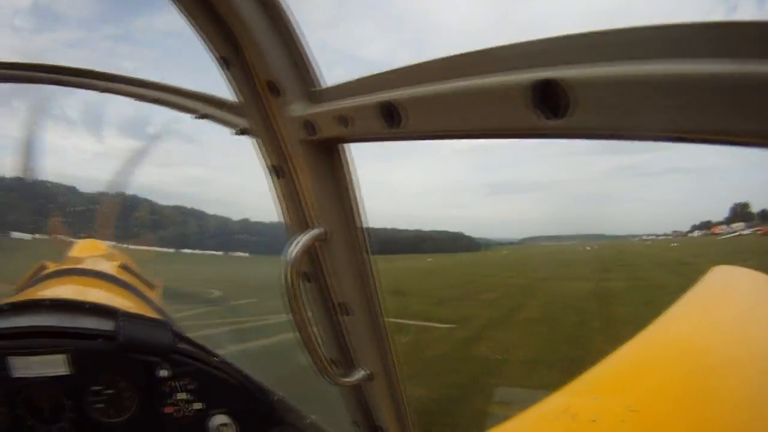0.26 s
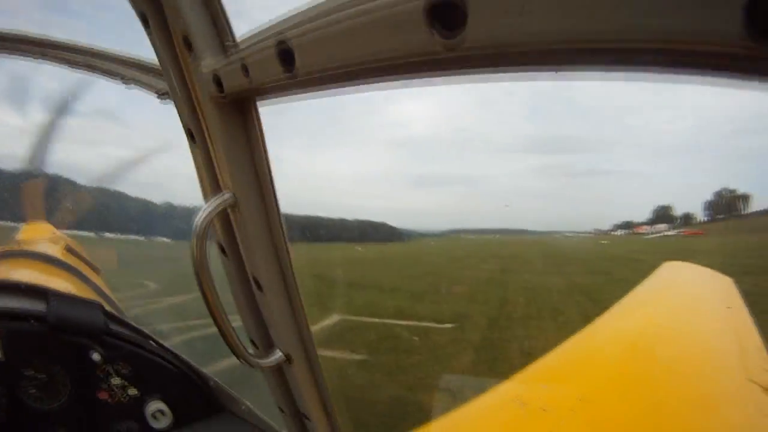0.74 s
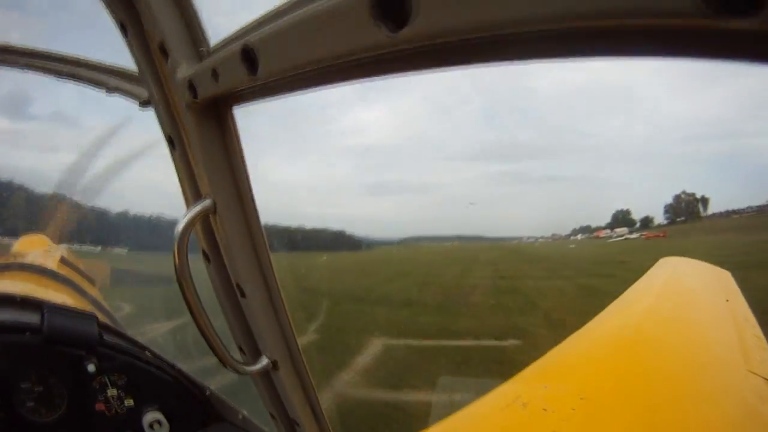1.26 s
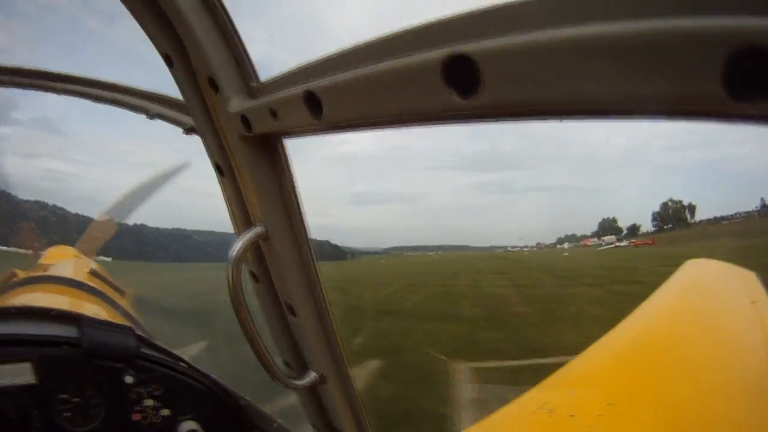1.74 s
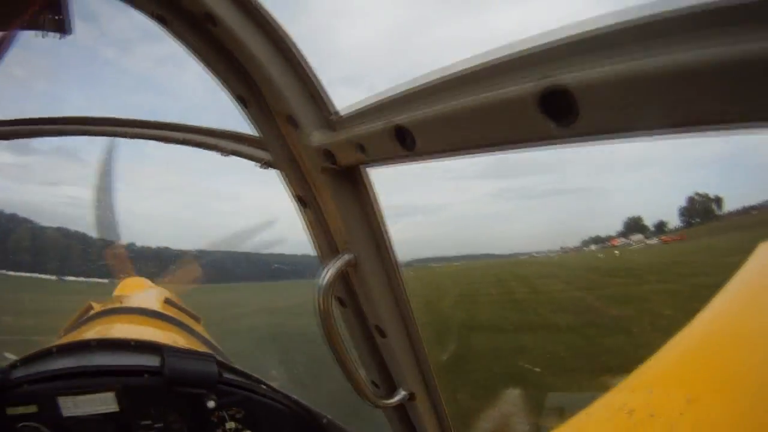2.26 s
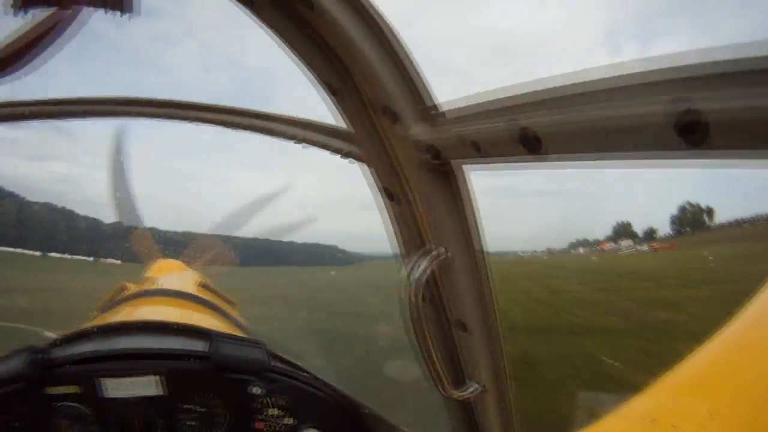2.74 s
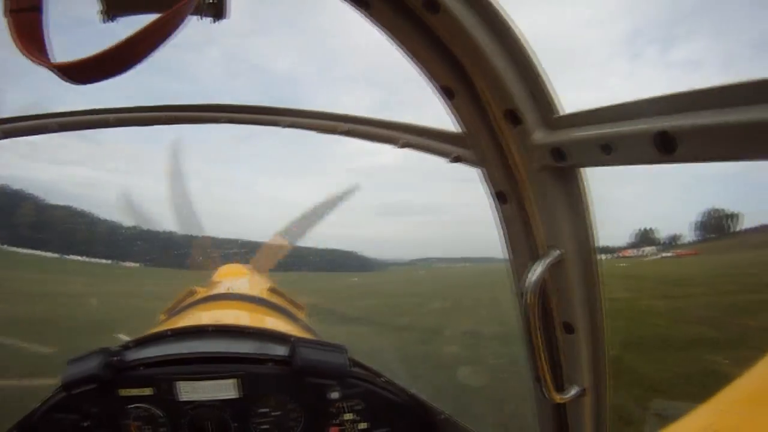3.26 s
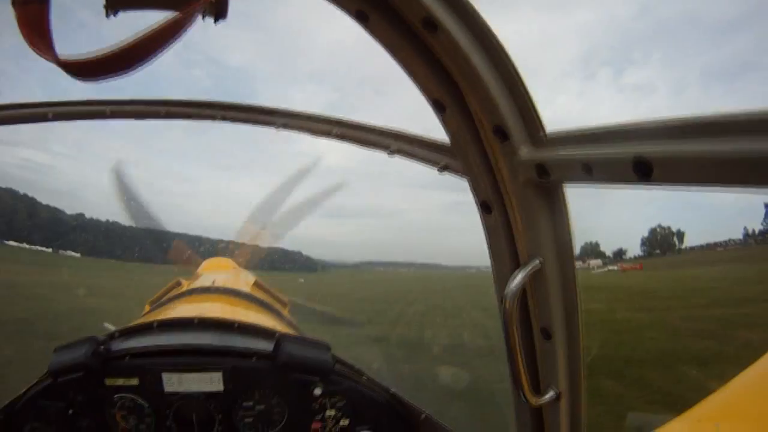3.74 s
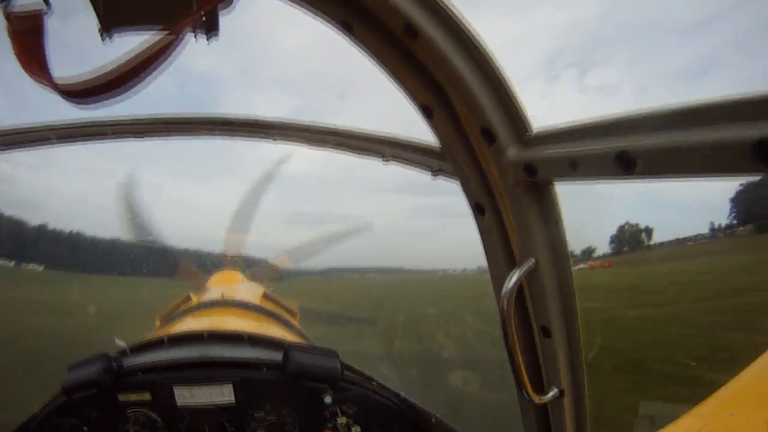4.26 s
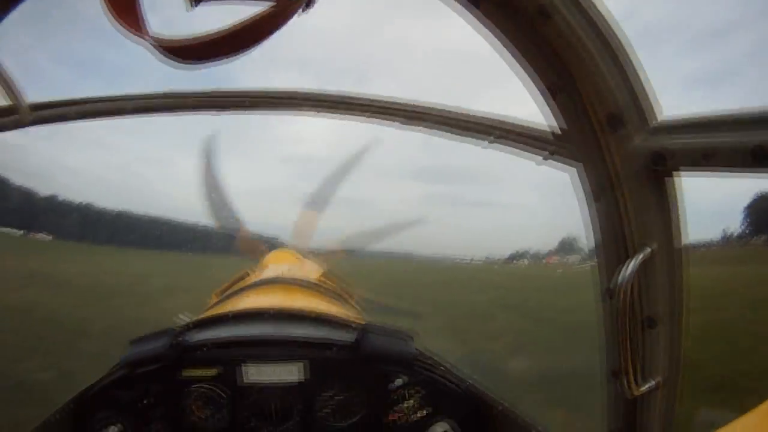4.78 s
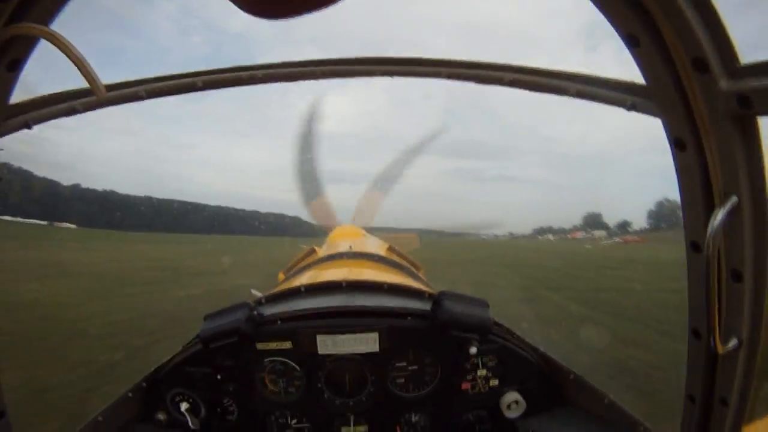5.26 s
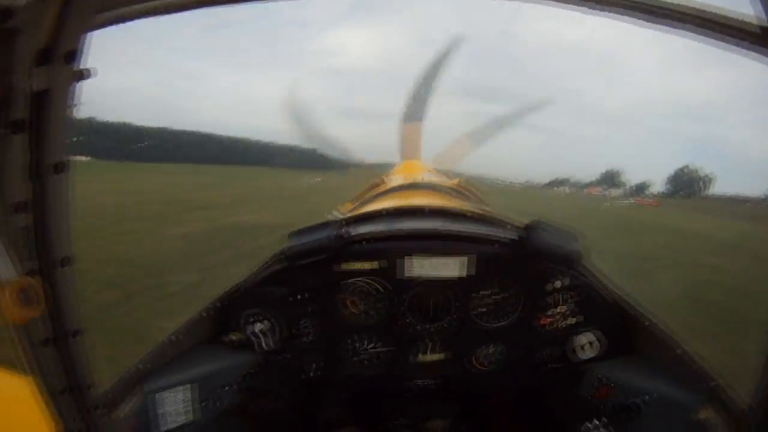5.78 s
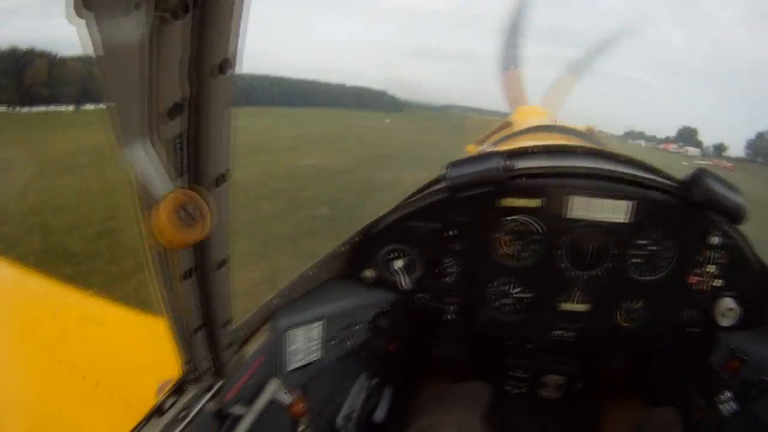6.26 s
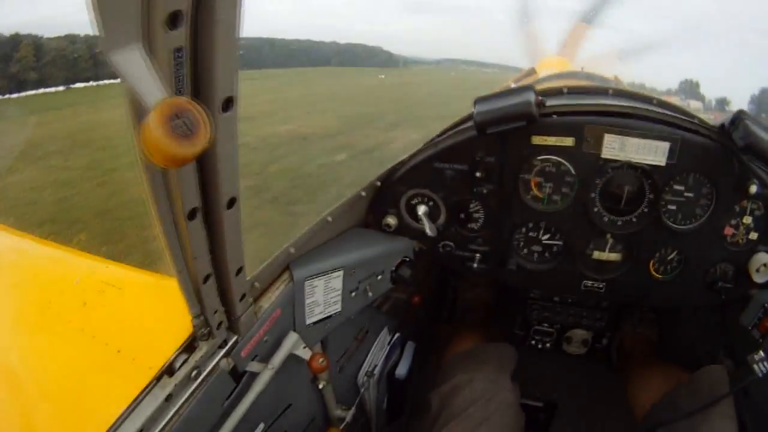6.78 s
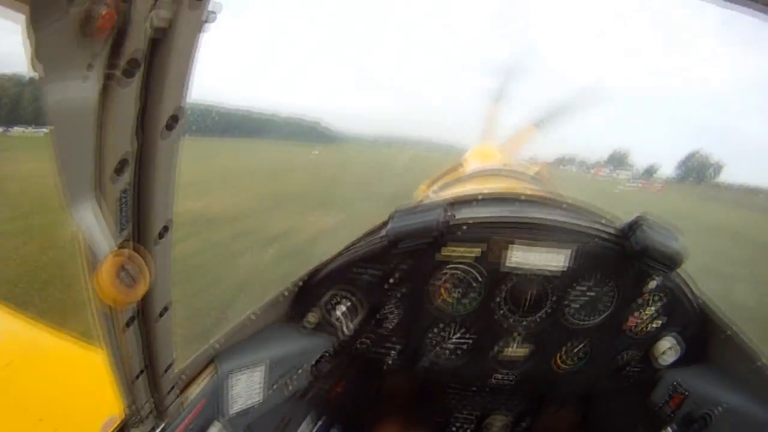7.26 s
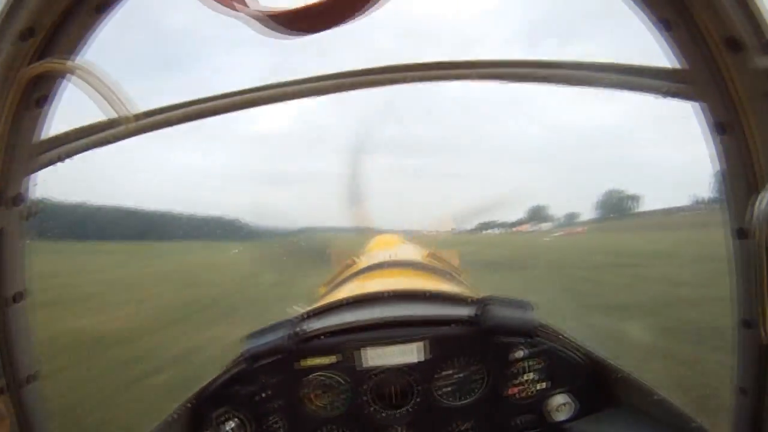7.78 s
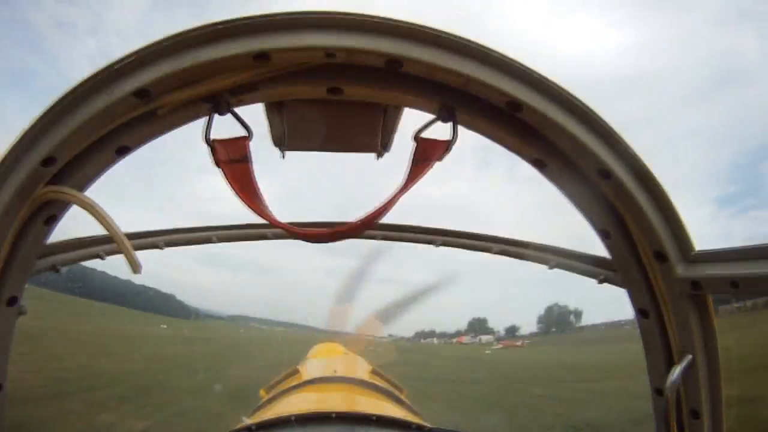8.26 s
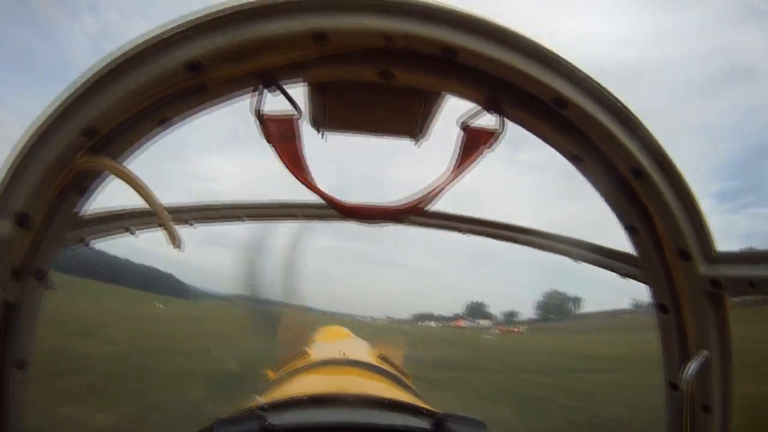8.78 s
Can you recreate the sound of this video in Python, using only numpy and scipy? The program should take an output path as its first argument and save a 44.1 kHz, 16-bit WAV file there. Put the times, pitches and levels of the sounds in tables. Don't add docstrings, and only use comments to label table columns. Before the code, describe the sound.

Heard inside a small aircraft cabin taxiing on grass: a piston engine booms and clatters steadily, drops to a slower, lumpier idle after a second, then picks up at about four seconds. Canopy rail, latch and window parts knock and buzz irregularly over low wheel rumble. The final half second brings a fast rise in revs. A small cased camera gives a close, boxy, gritty sound.

```python
import sys
import numpy as np
from scipy import signal
from scipy.io import wavfile
from scipy.ndimage import uniform_filter1d

SR = 44100
rng = np.random.default_rng(int(sys.argv[2]) if len(sys.argv) > 2 else 0)


def boost_factor(decibels):
    exponent = np.asarray(decibels, float) / 20
    return 10 ** exponent


def generate_wav(signal):
    frames = np.transpose(np.atleast_2d(signal))
    scaled = np.clip(frames, -1, 1) * 32767
    pcm = np.round(scaled).astype(np.int16)
    wavfile.write(sys.argv[1], SR, pcm)


N = 397782

# [t/s, firing rate f/Hz]
FIRING_RATE = [(0.0, 35.35), (0.88, 34.99), (1.3, 28.09), (1.61, 25.43), (1.98, 23.86), (2.49, 23.21),
               (3.4, 21.74), (3.85, 22.46), (4.0, 26.97), (4.38, 34.71), (4.6, 32.15), (5.02, 32.82),
               (5.14, 33.31), (6.14, 35.78), (7.7, 37.62), (8.35, 38.0), (8.77, 52.68), (9.02, 58.91)]
# [t/s, level/dB]
EFFORT = [(0, -0.5), (.8, -1), (1.1, -0.5), (1.9, -3.5), (2.8, -1.5), (3.5, -2), (3.85, 0.5), (4.05, 3),
          (4.4, 0.5), (5.45, 1.5), (5.85, -0.5), (6.3, -0.5), (7.4, .5), (8.15, -.5), (8.36, 3),
          (8.54, 3.5), (9.02, 3.5)]
# [t/s, side (-1 right wing, 0 ahead, 1 left wing)]
FACING = [
    (0, -0.96),
    (2.7, -0.9),
    (3.3, -0.13),
    (5.6, 0.35),
    (6.2, 0.67),
    (7.2, 0.1),
    (7.8, 0.087),
    (9.02, 0.24),
]
# [firing level/dB, clatter level/dB]
CYLINDERS = [(-5, 11), (-4, 12), (-3, 13.5), (-5.7, 13)]
# [t/s, extra level/dB]
ODD_FIRINGS = [(.682, -3), (.853, 2), (1.0, -5), (1.258, -4), (1.293, -9), (1.365, -2), (1.438, 0),
               (1.96, -2), (1.996, -6), (2.08, -6), (2.207, 7.5), (2.51, -4), (2.68, -4), (3.934, -6),
               (4.01, -5), (4.73, -4), (5.007, 0), (5.687, 3), (5.716, -13), (6.613, -8), (6.914, 1),
               (7.077, 1.5), (7.428, -10), (7.641, -5), (7.721, 2.5), (8.456, 5), (8.6, -6), (8.76, -3)]
# [f/Hz, width/Hz, level/dB, level per facing/dB, share of effort]
CABIN_MODES = [(24, 6, -33, 0, 0), (33, 4, -28, -1.5, 0), (60, 20, -30, 0, .8), (85, 25, -30, 2, 1.2),
               (112, 25, -27, 3, 1), (146, 32, -27, 1, -.6), (178, 28, -26, -1, -.2),
               (205, 20, -39, 0, 2.4), (226, 18, -31, 2.5, 1), (244, 16, -29, -2, 0), (290, 40, -40, 0, 2),
               (400, 200, -42.5, 0, 2.6)]
# [f/Hz, level per Hz/dB]
CABIN_SPECTRUM = [(24, -5), (40, -5), (97, 5.5), (145, 4), (178, 1), (205, -3.5), (249, -1), (307, -10),
                  (420, -15), (550, -42), (920, -120)]
# [f/Hz, level per Hz/dB]
PANEL_SPECTRUM = [(140, -16.5), (240, 3), (291, -1.5), (328, -4.5), (466, 0), (560, -6), (682, -21),
                  (831, -25), (1100, -24), (1430, -74), (2420, -120)]
# [f/Hz, level per Hz/dB]
GROUND_SPECTRUM = [(5.9, -46), (10, -4), (32, 3), (70, -4), (91, -4), (150, -120)]
# [f/Hz, level per Hz/dB]
METAL_SPECTRUM = [(380, -48), (650, -13.5), (883, -13), (1270, -5), (1590, -7), (1770, -5), (2220, -5.5),
                  (2550, -8), (2900, -8.5), (4170, -17), (4930, -16), (5360, -16.5), (5990, -24),
                  (7790, -60), (13200, -120)]
# [f/Hz, width/Hz, level/dB]
FRAME_PARTS = [(1270, 480, -10.5), (1780, 190, -8), (2260, 340, -4.4), (2853, 142, 0.6), (3253, 460, -1),
               (3870, 300, -1), (4580, 560, -3)]
# [t/s, half length/s, level/dB]
SHUDDERS = [
    (1.07, 0.092, 10),
    (3.998, 0.25, 7),
]
# [t/s, extra level/dB]
BUMPS = [(1.06, 13), (1.6, 12), (2.1, 5), (2.74, 13), (3.9, -1), (4.52, 11), (5.4, -5), (6.56, 3), (7.3, 3),
         (8.0, 10), (8.55, 8)]
# [t/s, peak level/dB, ring f/Hz]
RAIL_KNOCKS = [(.1447, -30, 2070), (.524, -30, 1780), (1.066, -24, 2040), (1.4549, -18, 2180),
               (1.6778, -27, 2170), (1.797, -28.5, 2300), (1.9612, -30, 2050), (2.0475, -27, 2150),
               (2.1256, -24, 2010), (2.8197, -24, 2080), (3.042, -23.5, 2280), (3.8645, -28, 1930),
               (3.822, -20.5, 2060), (3.911, -29, 2320), (4.008, -22, 2260), (4.139, -23, 2300),
               (4.3256, -21.5, 2000), (4.4616, -25, 2070), (5.1483, -26, 2110), (5.3093, -23, 1970),
               (5.3875, -22.5, 2350), (5.5636, -20.5, 1840), (5.678, -24.5, 1800), (5.8553, -20, 2160),
               (6.08, -27, 2250), (6.224, -28, 2250), (7.0637, -26.5, 1830), (7.643, -24, 2350),
               (8.4827, -24, 1800), (8.5505, -22, 1670)]
# [t/s, peak level/dB]
LATCH_KNOCKS = [(1.322, -21.5), (1.3905, -28), (1.4211, -16), (1.491, -24.5), (1.6307, -28.5),
                (1.9114, -30.5), (2.2947, -24.5), (2.5558, -23.5), (2.595, -24.5), (2.6855, -31),
                (2.999, -29), (3.175, -29), (3.224, -25.5), (3.5373, -26.5), (3.5857, -29), (4.5817, -25.5),
                (5.74, -21), (5.89, -26), (5.9365, -24.5), (6.364, -24.5), (6.4475, -32), (6.559, -26),
                (6.7354, -26), (6.89, -23), (7.2154, -27), (7.3223, -26), (7.39, -24), (8.28, -32),
                (8.7156, -32)]
# [t/s, peak level/dB]
WINDOW_BUZZES = [(3.311, -26.5), (4.139, -29), (5.309, -28), (5.5, -36), (5.615, -30), (5.85, -28),
                 (5.89, -27), (5.965, -27), (6.0797, -27), (6.2234, -25.5), (6.26, -36), (6.56, -28)]
# [t/s, peak level/dB, ring f/Hz]
CHINKS = [(1.3256, -36, 4800), (1.3907, -35, 4550), (1.4252, -30, 5100), (1.4596, -33.5, 4540),
          (1.49, -35, 4670), (1.8362, -49, 4800), (1.9165, -43, 4750), (1.9985, -40, 4380),
          (2.168, -36.5, 5170), (3.2216, -42, 4470), (3.5359, -43, 4540), (4.0088, -48, 4970),
          (4.4598, -43, 4540), (4.951, -34, 4300), (5.2829, -48, 4300), (5.3098, -38, 4930),
          (5.4294, -35, 5000), (5.5469, -37, 4830), (5.659, -30.5, 4800), (6.228, -34, 4740),
          (6.4487, -33, 4870), (6.777, -31, 4830), (6.8874, -35, 4700), (6.999, -36, 4800),
          (7.1063, -52, 4500), (7.213, -37, 5000), (8.4574, -31, 4900), (8.736, -36, 4430)]


def evened(x):
    return x / np.sqrt(np.mean(x ** 2) + 1e-20)


def columns(rows):
    s, *values = np.transpose(rows)
    return [np.interp(np.arange(N) / SR, s, v) for v in values]


def drift(count, span_s):
    size = max(int(span_s * SR / 400), 1)
    steps = uniform_filter1d(rng.standard_normal((count, N // 400 + 2)), size, axis=1)
    return np.array([np.interp(np.arange(N) / 400, np.arange(len(v)), evened(v)) for v in steps])


def coloured(x, spectrum):
    hz, db = np.transpose(spectrum)
    f = abs(np.fft.fftfreq(2 ** 15, 1 / SR)) + 1
    log_gain = np.log(boost_factor(np.interp(np.log(f), np.log(hz), db, left=-70, right=-90)))
    taps = np.fft.ifft(np.exp(np.conj(signal.hilbert(log_gain)))).real[:2 ** 13]
    return evened(signal.oaconvolve(x, taps)[:len(x)])


def resonate(x, hz, width_hz):
    r = np.exp(-np.pi * width_hz / SR)
    return 2 * signal.lfilter([1 - r], [1, -r * np.exp(2j * np.pi * hz / SR)], x).real


def wheels():
    t = np.arange(N) / SR
    base_db, db_per_s, bump_s = -34, -0.55, 0.17
    bumps_db = sum(extra_db * np.exp(-((t - s) / bump_s) ** 2) for s, extra_db in BUMPS)
    return boost_factor(base_db + db_per_s * t + bumps_db) * coloured(rng.standard_normal(N), GROUND_SPECTRUM)


def loose_knocks():
    hard_db, ring_per_db = -15, 0.045
    knocks = [(s, db, hz, 0.077, ring_per_db * (hard_db - db)) for s, db, hz in RAIL_KNOCKS]
    knocks += [(s, db, 2904, 0.071, ring_per_db * (hard_db - db)) for s, db in LATCH_KNOCKS]
    knocks += [(s, db, 1280, 0.15, 0.79) for s, db in WINDOW_BUZZES]
    knocks += [(s, db + 7.5, hz, 0.045, 0.65) for s, db, hz in CHINKS]
    return knocks


def canopy():
    out = np.zeros(N + SR)
    t = np.arange(SR // 10) / SR
    rise_s, hold_s, ring_width_hz = 0.0032, 0.008, 320
    spill_ratio, spill_gain = 0.773, 0.51
    knocks = loose_knocks()
    noise = rng.standard_normal((len(knocks), 2, len(t)))
    shaken = noise[:, 0].ravel()
    shaken = shaken + 2.0 * sum(boost_factor(db) * resonate(shaken, hz, width) for hz, width, db in FRAME_PARTS[1:])
    broad = coloured(shaken, METAL_SPECTRUM[3:]).reshape(len(noise), -1)
    for (s, db, hz, t60_s, share), wide, white in zip(knocks, broad, noise[:, 1]):
        shape = np.minimum(t / rise_s, 1) * boost_factor(-60 * np.maximum(t - hold_s, 0) / max(t60_s, 0.01))
        ring = 0
        for f, gain in ((hz, 1), (hz * spill_ratio, spill_gain)):
            ring = ring + gain * resonate(resonate(white * shape, f, ring_width_hz), f, ring_width_hz)
        share = np.clip(share, 0, 1)
        knock = np.sqrt(1 - share) * evened(wide * shape) + np.sqrt(share) * evened(ring)
        out[round(s * SR):][:len(t)] += boost_factor(db - 3.0) * knock / abs(knock).max()
    return out[:N]


def lumpiness():
    smooth_hz, lumpy_hz = 36, 27
    return np.clip((smooth_hz - columns(FIRING_RATE)[0]) / (smooth_hz - lumpy_hz), 0, 1)


def level_db(base_db, per_effort, facing_db, lumpy_db):
    moved_db = per_effort * columns(EFFORT)[0] + facing_db * columns(FACING)[0]
    return base_db + moved_db + lumpy_db * lumpiness()


def steadiness():
    return np.maximum(1.95 + 0.27 * columns(EFFORT)[0] - 0.42 * lumpiness(), 0.1)


def firings():
    turns = np.cumsum(columns(FIRING_RATE)[0]) / SR + 0.9
    chance = np.clip(rng.standard_normal((400, 12)), -1.9, 1.7)
    scatter_db = 1.8 + 1.7 * lumpiness()
    scatter_db = np.resize(scatter_db[np.flatnonzero(np.diff(turns.astype(int)))], len(chance))
    odd_s, odd_db = np.transpose(ODD_FIRINGS)
    odd = turns[((odd_s + 0.009) * SR).astype(int)].astype(int)
    chance[odd, :3] = (odd_db / scatter_db[odd])[:, None] * [1.7, 1.3, 1.1]
    strength_db, tick_db = np.array(CYLINDERS)[np.arange(len(chance)) % 4].T
    return turns, scatter_db[:, None] * chance[:, :4], strength_db, tick_db, chance[:, 4:]


def puffs(turns, strength_db, rise, fall, rest):
    phase = turns % 1
    shape = (1 - np.exp(-phase / rise)) * np.exp(-phase / fall)
    swell = uniform_filter1d(boost_factor(strength_db[turns.astype(int)]) * shape, size=40)
    return (rest + evened(swell)) / (rest + 1) * rng.standard_normal(N)


def valve_clatter(turns, shake_db, part_chance):
    steady = steadiness()
    ticks = puffs(turns, shake_db, 0.07, 0.5, 0.6 * steady)
    rings = 0
    for k, (hz, width_hz, db) in enumerate(FRAME_PARTS):
        shaken = puffs(turns, shake_db + 5.7 * part_chance[:, k], 0.12, 0.69, 0.21 * steady)
        rings = rings + boost_factor(db) * resonate(shaken, hz, width_hz)
    clatter = coloured(ticks + boost_factor(6.5) * rings, METAL_SPECTRUM)
    bright_db = level_db(-15, per_effort=2, facing_db=6, lumpy_db=-4.5)
    clatter = clatter + boost_factor(bright_db) * resonate(clatter, 5030, 1060)
    return boost_factor(level_db(-40.5, per_effort=0.9, facing_db=0.83, lumpy_db=1.15)) * clatter


def drumming_panels(turns, strength_db):
    t = np.arange(N) / SR
    panels = coloured(puffs(turns + 0.1, strength_db, 0.06, 0.16, 1.1 + 0.5 * steadiness()), PANEL_SPECTRUM)
    upper_db = level_db(-23.5, per_effort=0.4, facing_db=-3, lumpy_db=5)
    shudder_db = sum(db * np.exp(-((t - s) / half_s) ** 2) for s, half_s, db in SHUDDERS)
    upper = evened(resonate(resonate(panels, 726, 260), 670, 260))
    panels = panels + boost_factor(upper_db + shudder_db) * upper
    return boost_factor(level_db(-28.5, per_effort=0.79, facing_db=-0.94, lumpy_db=1.75)) * panels


def lope(turns):
    shapes = rng.standard_normal((2, 4, 40))
    shapes = (shapes - shapes.mean(1, keepdims=True)).reshape(2, -1)
    first, second = (np.interp(turns % 4, np.arange(160) / 40, v, period=4) for v in shapes)
    blend = np.arange(N) / SR * 0.5 + 0.3 * drift(1, 0.3)[0]
    return coloured(np.cos(blend) * first + np.sin(blend) * second, CABIN_SPECTRUM)


def cabin_roar(turns, strength_db):
    roar = coloured(puffs(turns + 0.1, strength_db, 0.05, 0.3, 2.6), CABIN_SPECTRUM)
    clean_db_per_hz, clean_above_hz = -0.3, 37
    roar_db = -25 + clean_db_per_hz * np.maximum(columns(FIRING_RATE)[0] - clean_above_hz, 0)
    return boost_factor(roar_db) * evened(roar + 0.8 * lope(turns))


def boom_db(hz):
    facing, effort_db = columns(FACING)[0][::100], columns(EFFORT)[0][::100]
    power = 0
    for mode_hz, width_hz, db, turn_db, share in CABIN_MODES:
        mode_db = db + turn_db * facing + share * effort_db
        power = power + boost_factor(2 * mode_db) / (1 + (2 * (hz - mode_hz) / width_hz) ** 4)
    return 10 * np.log10(power)


def exhaust(turns, strength_db):
    order = np.arange(1, 11)[:, None]
    lag_turns = 0.042 * order ** 2 - 0.26 * order + 0.015 * drift(10, 0.2)
    cabin_db = np.repeat(boom_db(order * columns(FIRING_RATE)[0][::100]), 100, axis=1)[:, :N]
    cabin_db = uniform_filter1d(cabin_db, size=400, axis=1)
    cabin_db = cabin_db - 1.5 * lumpiness() - 5 * (order > 7)
    tones = boost_factor(cabin_db + 1.0 * drift(10, 0.25) + 3.5) * np.cos(2 * np.pi * (order * turns - lag_turns))
    return tones.sum(0) * uniform_filter1d(boost_factor(strength_db[turns.astype(int)]), size=300)


def engine():
    turns, scatter_db, strength_db, tick_db, part_chance = firings()
    clatter = valve_clatter(turns, tick_db + 0.65 * scatter_db[:, 3], part_chance)
    panels = drumming_panels(turns, strength_db + scatter_db[:, 2])
    roar = cabin_roar(turns, 0.7 * scatter_db[:, 1])
    tone = exhaust(turns, 0.6 * strength_db + 0.45 * scatter_db[:, 0])
    return clatter + panels + roar + tone


def scene():
    return (wheels() + canopy() + engine())[None]


def low_pass(x):
    return signal.sosfilt(signal.butter(12, 16130, fs=SR, output="sos"), x)


def record(dry):
    dry = signal.sosfilt(signal.butter(3, 22, "high", fs=SR, output="sos"), dry)
    soft = 0.81 * np.tanh(dry / 0.64)
    slow = signal.resample_poly(soft, 40, 147, axis=1, window=("kaiser", 3.0))
    held = signal.resample_poly(np.repeat(slow, 4, axis=1), 147, 160, axis=1)
    held = np.pad(held, ((0, 0), (0, 64)))[:, :N]
    band_limit = signal.firwin(1023, 15400, window=("kaiser", 7), fs=SR)
    held = signal.oaconvolve(held, band_limit[None], "same")
    return low_pass(held)


dry = scene()
out = record(dry)
generate_wav(out)
```